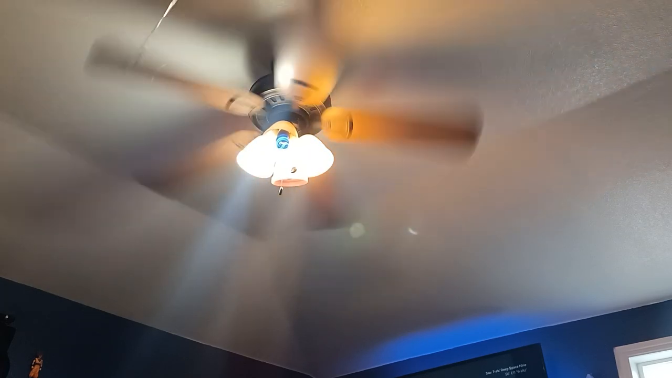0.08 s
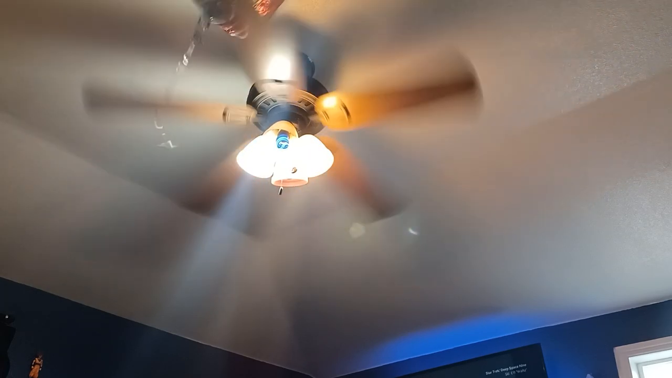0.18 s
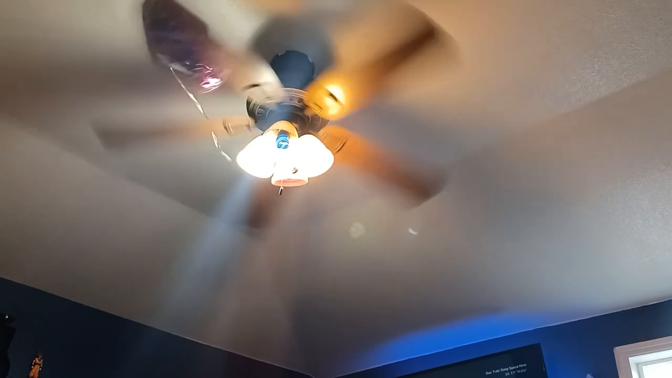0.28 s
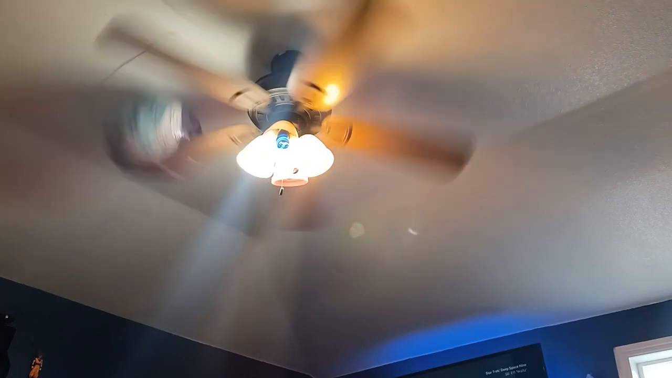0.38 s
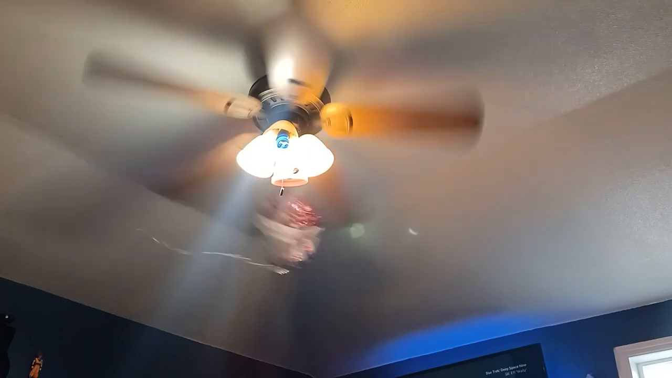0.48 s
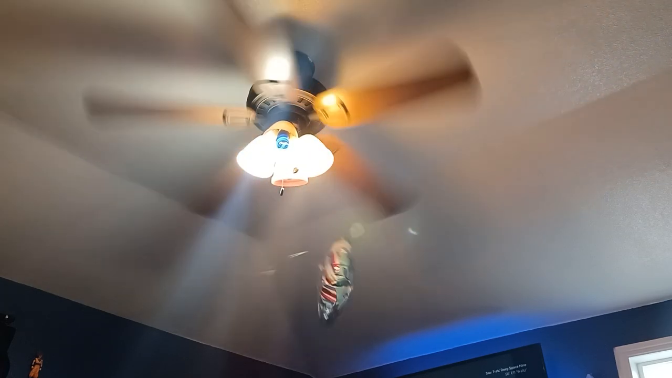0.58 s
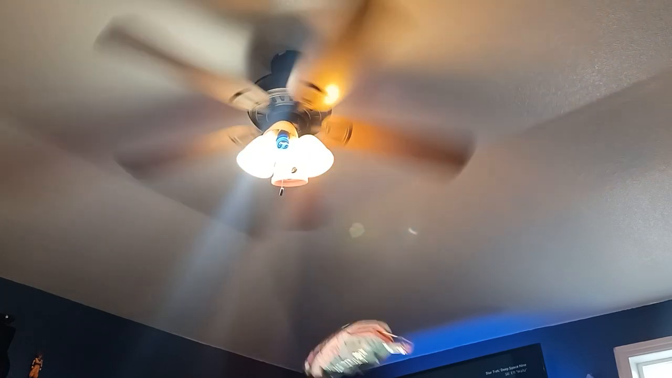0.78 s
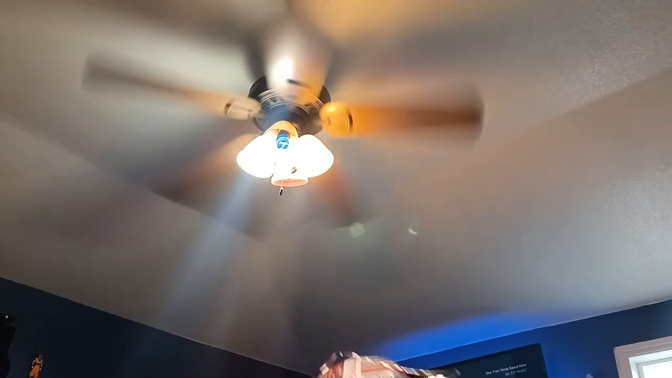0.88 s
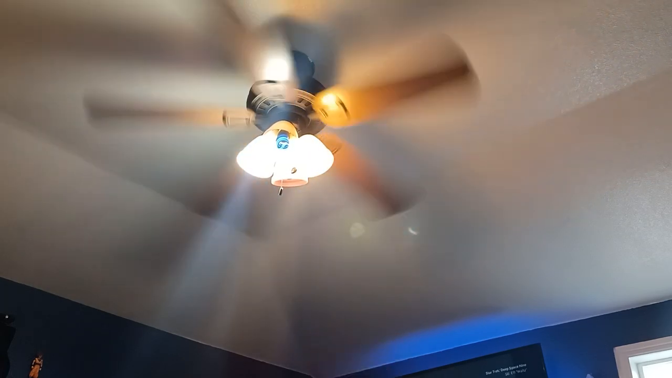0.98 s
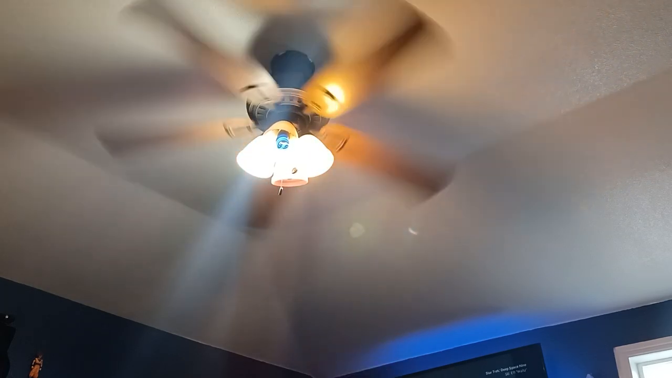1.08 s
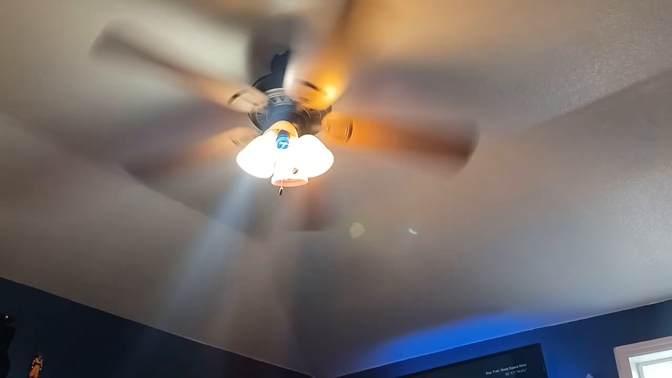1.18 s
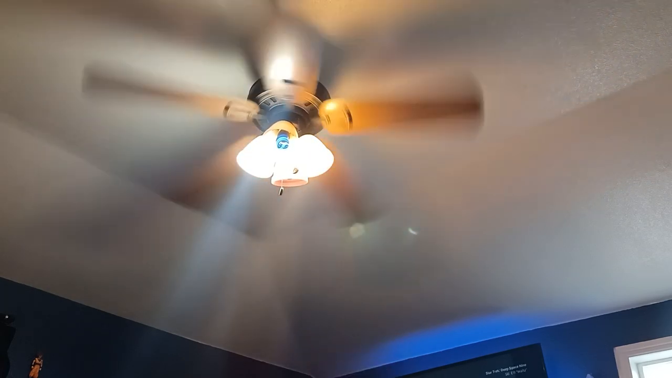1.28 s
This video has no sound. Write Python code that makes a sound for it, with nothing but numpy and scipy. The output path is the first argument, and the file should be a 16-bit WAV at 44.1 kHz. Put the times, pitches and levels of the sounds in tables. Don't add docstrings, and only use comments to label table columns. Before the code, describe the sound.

A foil balloon is struck by spinning ceiling fan blades in a small bedroom. Faint crinkly brushes come at 0.04 and 0.1 seconds, a smack with crumpling at 0.2, and the loudest, hollow popping smack at 0.3. Crackling flutter follows, with a softer knock at 0.56, fading by 0.75 to a thin whisper and a barely audible last touch near 0.88, over very faint motor hum and draught.

```python
import sys
import numpy as np
from scipy import signal
from scipy.fft import rfft, irfft, next_fast_len
from scipy.io import wavfile

SR = 44100
rng = np.random.default_rng(int(sys.argv[2]) if len(sys.argv) > 2 else 0)


def output_pcm(signal):
    pcm = np.clip(np.atleast_2d(signal).T, -1, 1) * 32767
    wavfile.write(sys.argv[1], SR, np.round(pcm).astype(np.int16))


def makeup_ratio(level_db):
    decades = np.asarray(level_db, float) / 20
    return 10 ** decades


N = 59535

# start_s, level_db, thump_db, crinkle_db
TUMBLING = [(0, -44.5, -0.5, -7.5), (.06, -53.5, -19, 8.5), (0.098, -54.5, -23, 5), (.17, -55.5, -1, -4),
            (0.198, -63, -27, 7), (.36, -23.5, -5.5, -7.5), (.45, -38, 4.5, -5), (.51, -38, 1.5, -3.5),
            (.56, -37.5, -3.5, -8), (0.629, -46.5, -5.5, -1.5), (.68, -55.5, -5, -3),
            (.73, -65.5, 2.5, -0.5), (.8, -67, 9, -5.5), (.9, -68, 11.5, -1.5), (0.969, -68, 5, -5),
            (1.02, -70.5, -4, -14), (1.101, -76.5, 1.5, -14.5), (1.2, -84, 7, -26.5),
            (1.299, -83.5, 18, -23)]
FOLD_TIMES = [.0445, .0457, .1063, .1081, .1283, .1297, .2072, .2126, .2205, .2232, .3016, .3067, .3215,
              .3254, .3325, .5674, .8965]
# level_db, push_on_gas_db
FOLD_LEVELS = [(-11, -14), (-15, -14.5), (-4.5, -14.5), (-10, -15.5), (-10, -10.5), (-7, -9.5), (-9, 10),
               (3, -4), (3.5, -1), (-10, 0.5), (7, -2), (9.5, 3.5), (8, 1), (13, -5), (10.5, -4),
               (-18.5, -9), (-41.5, 11.5)]


def rms_one(x):
    return x / np.sqrt(np.mean(x ** 2) + 1e-20)


def shaped(x, table, column=1, gain=makeup_ratio):
    size = next_fast_len(x.shape[-1] + 4096)
    hz = np.maximum(np.arange(size // 2 + 1) * SR / size, 1)
    rows = np.array(table)
    curve = np.interp(np.log(hz), np.log(rows[:, 0]), rows[:, column])
    return irfft(rfft(x, size) * gain(curve), size)[..., :x.shape[-1]]


def drift(rate_hz):
    r = np.exp(-2 * np.pi * rate_hz / SR)
    noise = rng.standard_normal(N + SR)
    return rms_one(signal.lfilter([1], [1, -2 * r, r * r], noise)[SR:])


def pair(x):
    # frequency_hz, likeness (-1 to 1)
    likeness = [(60, 0.82), (180, -0.4), (350, 1), (700, .5), (1500, -0.19), (3000, -0.071), (8000, -1.1),
                (14000, .05)]
    mid = shaped(x[0], likeness, gain=lambda c: np.sqrt(1 + np.clip(c, -1, 1)))
    side = shaped(x[1], likeness, gain=lambda c: np.sqrt(1 - np.clip(c, -1, 1)))
    return np.array([mid + side, mid - side]) / np.sqrt(2)


def fan():
    # frequency_hz, level_db (rms), wobble_db
    hum_lines = [(119.5, -67, 2.5), (227, -74.5, 6.5)]
    # frequency_hz, level_db (per Hz)
    draught = [(30, -34), (70, 1), (300, 7.5), (500, -5.5), (1000, -20.5), (2200, -28), (4000, -46),
               (16000, -67)]
    t = np.arange(N) / SR
    hum = 0
    for hz, level_db, wobble_db in hum_lines:
        level = np.sqrt(2) * makeup_ratio(level_db + wobble_db * drift(2.8))
        hum = hum + level * np.sin(2 * np.pi * hz * t + 0.51 * drift(4))
    air = rms_one(shaped(pair(rng.standard_normal((2, N))), draught))
    return hum + makeup_ratio(-70 + 1.5 * drift(3)) * air


def room(x, lag_s):
    # frequency_hz, t60_s
    decay = [(60, .5), (250, .42), (1500, .4), (4000, .34), (8000, .24), (14000, .2)]
    tail_db, onset_s = 0.5, 0.0013
    t = np.arange(int(.8 * SR)) / SR
    rows = np.array(decay)
    white = pair(rng.standard_normal((2, len(t))))
    edges = np.geomspace(60, 19000, 10)
    tail = 0
    for low, high in zip(edges, edges[1:]):
        t60 = np.interp(np.log(low * high) / 2, np.log(rows[:, 0]), rows[:, 1])
        band = signal.butter(2, [low, high], "band", fs=SR, output="sos")
        tail = tail + signal.sosfilt(band, white) * 10 ** (-3 * t / t60)
    tail = tail * (1 - np.exp(-(t / onset_s) ** 2)) * makeup_ratio(tail_db - 35)
    late = np.interp(np.arange(N) - round(lag_s * SR), np.arange(N), x)
    direct = np.array([late, x])
    return makeup_ratio(-5) * (direct + signal.fftconvolve(x[None], tail, axes=1)[:, :N])


def modes(push, table):
    out = 0
    for k, (hz, level_db, t60) in enumerate(table):
        r = 10 ** (-3 / (t60 * SR))
        w = 2 * np.pi * hz / SR
        gain = makeup_ratio(level_db) * np.sin(w) * (-1) ** k
        out = out + signal.lfilter([0, gain], [1, -2 * r * np.cos(w), r * r], push + 1e-18)
    return out


def force(column=None, slap=0):
    # start_s, level_db, crumpling_s, thump_db, crinkle_db
    contacts = [
        (0.036, -49.5, 0.0033, 16.5, -13),
        (0.1066, -44, 0.0094, -22, -8.5),
        (0.126, -42.5, 0.031, -19.5, -4),
        (0.205, -27.5, .006, 2.5, -14),
        (0.2117, -28.5, 0.021, -35, -5.5),
        (.3012, -16.5, 0.022, 4.5, -13),
        (0.5641, -36, .02, -12.5, -3),
        (0.875, -66.5, 0.0038, 9, -31.5),
    ]
    attack_s, release_s, slap_s = .0006, 0.024, 0.018
    t = np.arange(N) / SR
    out = 0
    for row in contacts:
        since = np.maximum(t - row[0], 0)
        release = np.exp(-np.maximum(since - row[2], 0) / release_s)
        shape = (1 - np.exp(-since / attack_s)) * release
        shape = shape + slap * (since > 0) * np.exp(-since / slap_s)
        out = out + makeup_ratio(row[1] + (row[column] if column else 0)) * shape
    return out


def gas():
    # frequency_hz, level_db, t60_s
    breathing = [(151, -16, .2), (222.7, -0.5, 0.19), (254, -2.5, 0.12), (278.5, -0.5, 0.22),
                 (319.6, -6, 0.12), (352, -15, 0.12), (466.8, -4.5, 0.13), (544, -9.5, 0.24)]
    t = np.arange(N) / SR
    s, tumble_db, thump_db, _ = np.transpose(TUMBLING)
    squeeze = makeup_ratio(-5.0) * force(column=3) + makeup_ratio(np.interp(t, s, tumble_db + thump_db))
    folds = np.zeros(N)
    for at, (level_db, push_db) in zip(FOLD_TIMES, FOLD_LEVELS):
        folds[int(at * SR)] = makeup_ratio(level_db + push_db)
    soft = signal.butter(1, 3600, fs=SR)
    turbulent = signal.lfilter(*soft, rng.standard_normal((2, N)) * squeeze)
    stirred = pair(modes(turbulent, breathing))
    return makeup_ratio(-33) * stirred + makeup_ratio(-31) * modes(signal.lfilter(*soft, folds), breathing)


def clicks(per_s, spread_db, upward):
    draw = rng.random((3, N))
    sizes = makeup_ratio(spread_db * np.minimum(-np.log(draw[0] + 1e-9), 4))
    signed = sizes * np.where(draw[1] < upward, 1, -1)
    return rms_one(signed * (draw[2] < per_s / SR))


def patch(snaps):
    # frequency_hz, level_db, t60_s
    skin = [(478, -2, 0.12), (478, 0.5, 0.12), (528, -8, 0.031), (633, -13, 0.027), (683, -11, 0.089),
            (780, -0.5, 0.032), (884.7, 3, 0.027), (1030, -11.5, .05), (1150, -18.5, .06)]
    # frequency_hz, level_db (per Hz)
    crinkle_colour = [(1500, 3), (5000, 2), (7000, -2.5), (8200, -10.5), (10000, -3.5), (12500, 0.5),
                      (15600, -8), (16300, -24)]
    t = np.arange(N) / SR
    s, tumble_db, _, crinkle_db = np.transpose(TUMBLING)
    flex = makeup_ratio(np.interp(t, s, tumble_db) + 2.5 * drift(25))
    folds = np.zeros(N)
    for at, level_db, _ in snaps:
        folds[int(at * SR)] = makeup_ratio(level_db)

    push = clicks(1300, 2.5, upward=0.87) * (force() + flex) + folds
    low_cut = signal.butter(1, 300, "high", fs=SR, output="sos")
    high_cut = signal.butter(5, 1883, fs=SR, output="sos")
    ringing = makeup_ratio(8.5) * push + makeup_ratio(-40) * modes(push, skin)
    pops = signal.sosfilt(np.vstack([low_cut, high_cut]), ringing)

    drive = force(column=4, slap=makeup_ratio(-1 - 16)) + flex * makeup_ratio(np.interp(t, s, crinkle_db))
    creases = clicks(11000, 1.5, upward=0.58) * drive
    near = np.clip((.76 - t) / .05, 0, 1)
    whisper = signal.butter(2, [3800, 6600], "band", fs=SR, output="sos")
    far = signal.sosfilt(whisper, creases * (1 - near))
    return pops + makeup_ratio(5) * shaped(creases * near + far + 0.068 * folds, crinkle_colour)


def scene():
    lags = [.00007, .00014, .0002, .00027]
    # frequency_hz, left_minus_right_db
    shading = [(60, -1.5), (150, .6), (300, 3), (600, 5), (1300, 8.5), (2500, 1.5), (5000, 0), (10000, -1)]
    fan_pan_db = -6
    snaps = np.column_stack([FOLD_TIMES, FOLD_LEVELS])
    foil = 0
    for k, lag_s in enumerate(lags):
        foil = foil + room(patch(snaps[k::len(lags)]), lag_s)
    balloon = foil + gas()
    left = shaped(balloon[0], shading, gain=lambda db: makeup_ratio(db / 2))
    right = shaped(balloon[1], shading, gain=lambda db: makeup_ratio(-db / 2))
    rumble_cut = signal.butter(2, 120, "high", fs=SR, output="sos")
    shaded = signal.sosfilt(rumble_cut, np.array([left, right]))
    return shaded + fan() * makeup_ratio(np.array([[.5], [-.5]]) * fan_pan_db)


def low_pass(x):
    return signal.sosfilt(signal.butter(12, 16970, fs=SR, output="sos"), x)


def record(dry):
    hissy = dry + makeup_ratio(-85.5) * rng.standard_normal(dry.shape)
    top_cut = signal.cheby2(8, 50, 17200, fs=SR, output="sos")
    return low_pass(signal.sosfilt(top_cut, hissy))


dry = scene()
out = record(dry)
output_pcm(out)
```